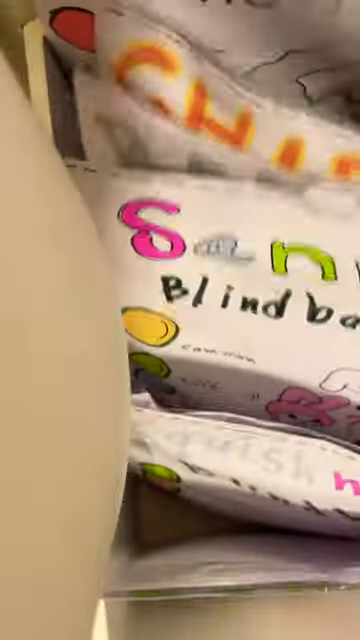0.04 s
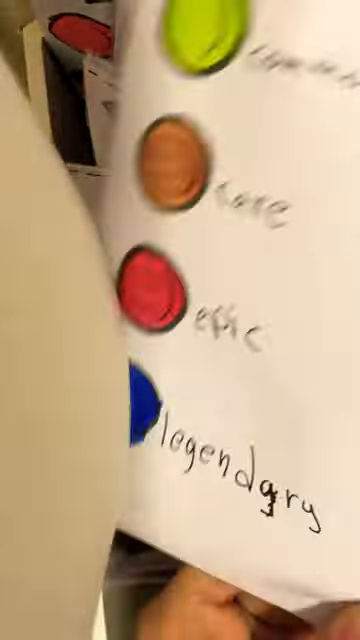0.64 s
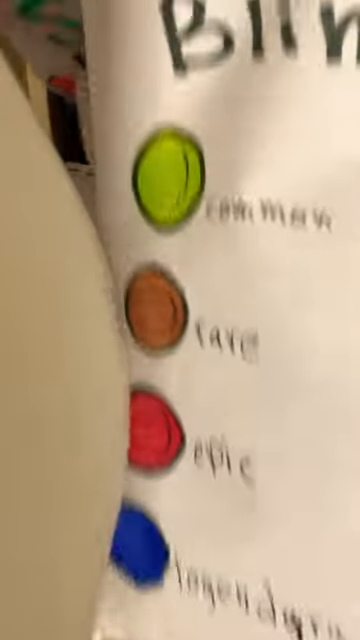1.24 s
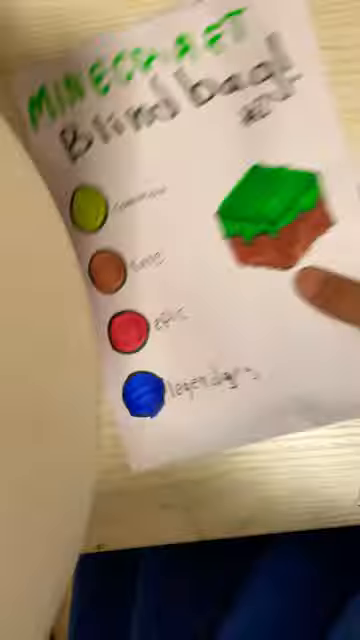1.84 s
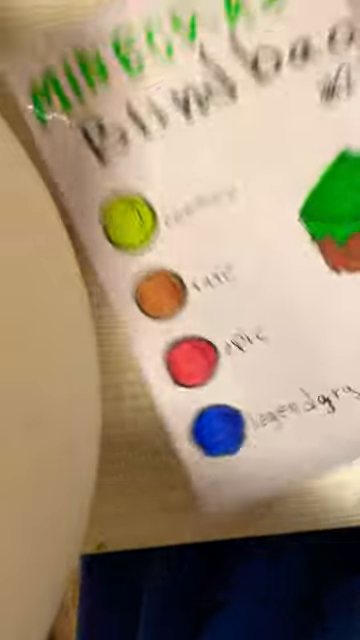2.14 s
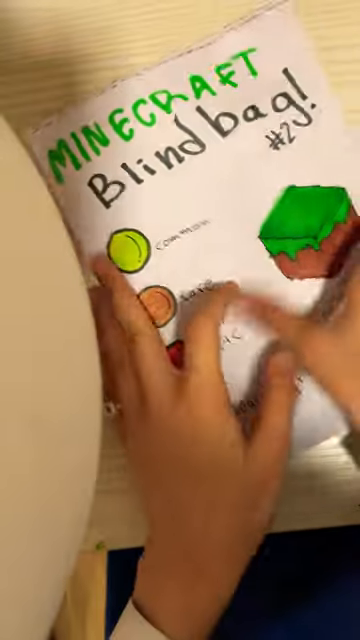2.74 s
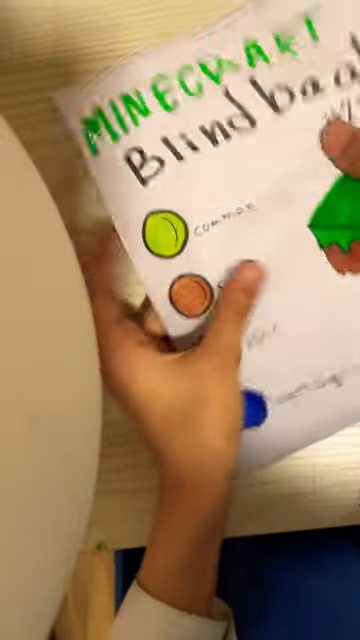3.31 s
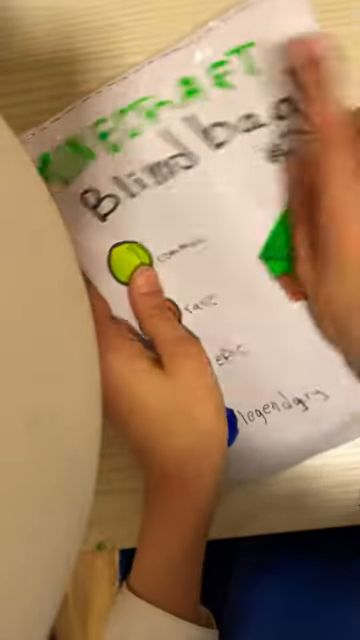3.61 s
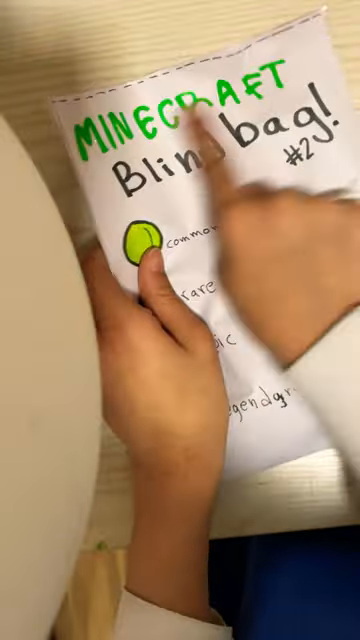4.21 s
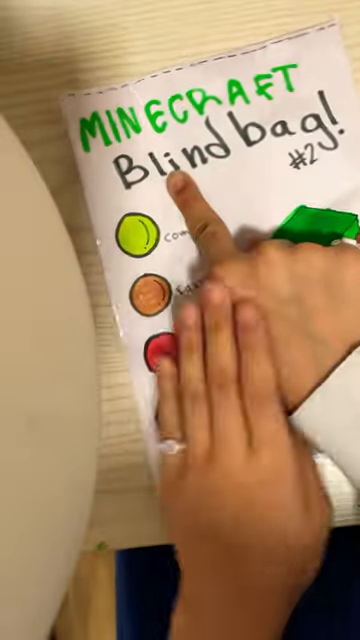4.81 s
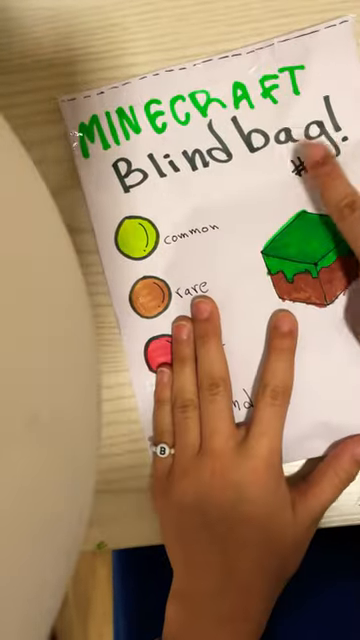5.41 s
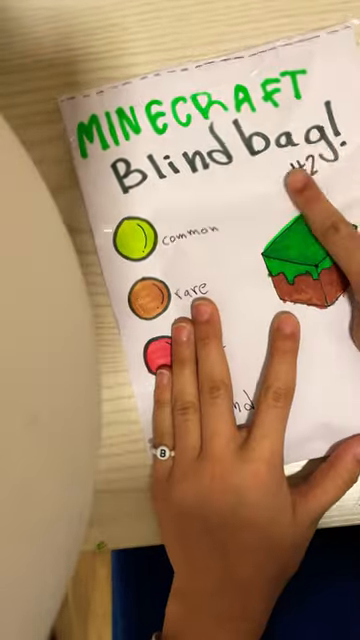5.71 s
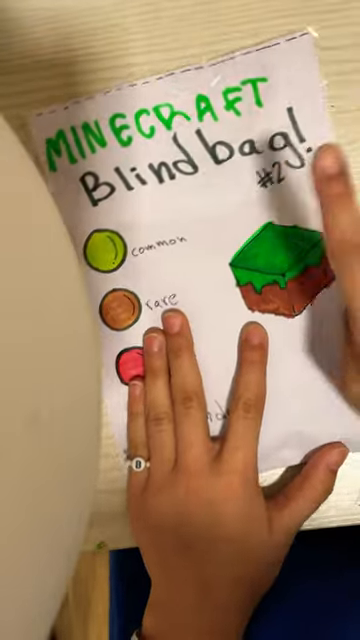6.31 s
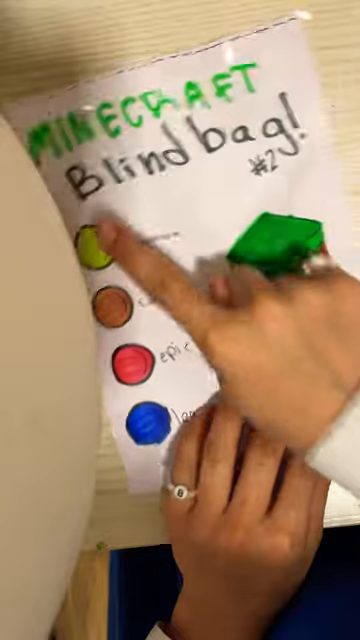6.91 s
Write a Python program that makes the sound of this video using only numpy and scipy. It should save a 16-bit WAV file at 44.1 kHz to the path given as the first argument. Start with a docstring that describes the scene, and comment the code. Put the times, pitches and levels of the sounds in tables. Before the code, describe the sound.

A paper packet is handled close to the microphone in a small room, over a faint hiss and low drone. From the start until about 1.8 seconds it is pulled out of a box: sheets rub, fingers slide and creases snap lightly, with a few soft bumps. The sound drops out for an instant at 1.8 seconds and stays quiet until the packet lands on a wooden table at 2.3 with a crack and a soft thump. A crunch follows at 2.5. From about 2.8 to 5.1 seconds hands press and smooth it flat, with uneven rubbing strokes, dense, sharp crackling and occasional thuds. Between 5.4 and 6.1 seconds fingers tap it about five times, each tap a papery crunch with a hollow thump that falls in pitch and rings briefly in the table. One more tap comes at 6.6, then a few faint crinkles.

```python
"""Over a faint hiss in a small room, a paper packet is pulled out of a box close to a phone: sheets rub,
fingers slide, the packet flexes and creases snap. The level dips briefly at 1.8 s. At 2.27 s the packet lands
on a wooden table and is pressed flat: patches crush under the fingers and strokes of the hand rub and crackle.
Throughout, blows give hollow, falling thumps that ring on in the table, more fully once the packet lies on it."""
import sys
import numpy as np
from scipy import signal
from scipy.fft import rfft, irfft, next_fast_len
from scipy.io import wavfile
from scipy.ndimage import uniform_filter1d

SR = 44100
rng = np.random.default_rng(int(sys.argv[2]) if len(sys.argv) > 2 else 0)


def unload_wav(signal):
    """Save mono or channel-first audio to the path in sys.argv[1] as 16-bit WAV at rate SR, clipped to [-1, 1]."""
    wavfile.write(
        sys.argv[1],
        SR,
        np.round(np.clip(np.atleast_2d(signal).T, -1, 1) * 32767).astype(np.int16),
    )


N = 306495
TIME_S = np.arange(N) / SR
BLOCK = 4096  # samples per crack
AGE_S = np.arange(BLOCK) / SR
FREQ_HZ = np.arange(BLOCK // 2 + 1) * SR / BLOCK + 1
LANDING_S = 2.27


def undb(db):
    """Decibels to gain."""
    return 10 ** (np.asarray(db) / 20)


def unit(x):
    """Scale to rms 1."""
    return x / np.sqrt(np.mean(x ** 2))


def fade(t, t60):
    """Free decay by 60 dB in t60."""
    return np.exp(-np.log(1000) * t / t60)


def add(out, start_s, x):
    """Mix x into out."""
    i = max(int(start_s * SR), 0)
    out[i:i + len(x)] += x[:max(len(out) - i, 0)]


def gains(spectrum, hz):
    """Gain of a (freq_hz, level_db) spectrum at hz."""
    freq_hz, level_db = np.transpose(spectrum)
    return undb(np.interp(np.log(hz + 1), np.log(freq_hz), level_db))


def coloured_noise(spectrum):
    """Scene-long noise with this spectrum, rms 1."""
    n = next_fast_len(N)
    white = rfft(rng.standard_normal(N), n)
    hz = np.arange(n // 2 + 1) * SR / n
    return unit(irfft(white * gains(spectrum, hz), n)[:N])


def minimum_phase(gain):
    """Response whose ringing all follows the blow."""
    cepstrum = irfft(np.log(gain + 1e-9))
    cepstrum[1:BLOCK // 2] *= 2
    cepstrum[BLOCK // 2 + 1:] = 0
    return np.exp(rfft(cepstrum))


def wander(t, rate_hz):
    """Random wander, spread near 1."""
    return np.interp(t * rate_hz, np.arange(BLOCK), rng.standard_normal(BLOCK))


def strokes(rows, t60_s, attack_s=0.0037):
    """Envelope of hand strokes: each starts quickly, holds and dies away."""
    power = 0
    for start_s, length_s, level_db in rows:
        attack = np.clip((TIME_S - start_s) / attack_s, 0, 1)
        release = fade(np.clip(TIME_S - start_s - length_s, 0, 1), t60_s)
        power += (undb(level_db) * attack * release) ** 2
    return np.sqrt(power)


# Hiss spectrum: freq_hz, level_db
HISS_SPECTRUM = [(25, -16), (60, -4), (200, -5.5), (500, -15), (1500, -9.5), (5000, -0.5), (16000, -27)]

def background(hiss_db=-64, drone_db=-54, drone_hz=112, width_hz=14):
    """Faint hiss and a low drone held in one room resonance."""
    resonance = signal.iirpeak(drone_hz, drone_hz / width_hz, fs=SR)
    drone = unit(signal.lfilter(*resonance, coloured_noise(FLEX_SPECTRUM)))
    return undb(hiss_db) * coloured_noise(HISS_SPECTRUM) + undb(drone_db) * drone


def room(x, wet_db=-19, t60_s=0.48, treble_t60_s=0.14, split_hz=4500, build_s=0.0025):
    """Small furnished room: a diffuse tail whose treble dies first."""
    t = np.arange(SR // 2) / SR
    noise = rng.standard_normal(len(t))
    low = signal.sosfilt(signal.butter(1, split_hz, fs=SR, output="sos"), noise)
    tail = low * fade(t, t60_s) + (noise - low) * fade(t, treble_t60_s)
    tail *= 1 - np.exp(-(t / build_s) ** 2)
    return x + undb(wet_db) * signal.fftconvolve(x, tail / np.linalg.norm(tail))[:N]


# Flexing packet spectrum: freq_hz, level_db
FLEX_SPECTRUM = [(25, -20), (42, -14.5), (60, -7), (115, -.5), (160, -4.5), (240, -2.5), (420, -6.5),
                 (700, -15), (1400, -34)]
# Bending in the hands: time_s, level_db
BEND_CURVE = [(0.0, -34), (0.27, -56.5), (0.64, -43.5), (0.95, -57.5), (1.43, -40.5), (1.59, -42),
              (1.76, -55.5), (1.95, -76.5), (2.42, -55), (2.96, -46.5), (4.59, -49.5), (4.95, -44),
              (5.23, -52.5), (5.46, -53.5), (5.81, -40.5), (5.96, -37.5), (6.27, -57.5), (6.95, -53.5)]

def flex(rubbing, bend_db=-2, drag_db=-10, rough_db=4):
    """The whole packet flexes, bent by the hands and dragged by the rubbing."""
    bending = undb(np.interp(TIME_S, *np.transpose(BEND_CURVE)) + bend_db)
    envelope = np.hypot(bending, undb(drag_db) * rubbing)
    return coloured_noise(FLEX_SPECTRUM) * envelope * undb(rough_db * wander(TIME_S, rate_hz=45))


def friction(spectrum, grip, rough_db, gain_db=1.5):
    """Surfaces catch and slip unevenly as the grip wanders."""
    return coloured_noise(spectrum) * undb(gain_db + rough_db * grip)


def crackle(count, low_hz, high_hz, spread_db=5, t60_cycles=15, modes=6):
    """Tiny wrinkles, each ringing a few short modes of its own."""
    out, t = np.zeros(N), AGE_S[:BLOCK // 8]
    sign = (-1) ** np.arange(modes)[:, None]
    for when, weakness, *pitches in rng.random((count, modes + 2)):
        hz = low_hz * (high_hz / low_hz) ** np.array(pitches)[:, None]
        grain = np.sum(sign * np.sin(2 * np.pi * hz * t) * fade(t * hz, t60_cycles), axis=0)
        add(out, when * N / SR, undb(-spread_db * np.log(0.046 + weakness)) * grain)
    return unit(out)


# Sheet on sheet or packet on table: start_s, length_s, level_db
RUB_STROKES = [(0, 0.15, -44.5), (.15, 0.23, -58.5), (.51, .2, -46), (.73, .26, -61), (1.2, 0.48, -53.5),
               (1.85, 0.54, -60), (2.29, 0.049, -41.5), (2.53, .3, -45), (2.85, 0.22, -37.5),
               (3.125, 0.048, -37), (3.22, .08, -36), (3.32, 0.29, -34), (3.63, 0.15, -39),
               (3.82, 0.4, -54.5), (3.98, 0.023, -36.5), (4.17, 0.062, -46), (4.24, .14, -37.5),
               (4.47, 0.24, -45), (4.58, 0.18, -45), (4.9, 0.11, -46.5), (5, .11, -35.5),
               (5.39, 0.092, -40), (5.57, 0.098, -41.5), (5.77, .46, -52.5), (6.48, 0.12, -49),
               (6.61, 0.12, -47.5), (6.84, 0.053, -41)]
# Rubbing sheet spectrum: freq_hz, level_db
RUB_SPECTRUM = [(250, -26), (600, -2.5), (1000, -2.5), (1400, -3.5), (2100, -5.5), (3300, -3.5), (5000, -6),
                (7000, -9.5), (12000, -20)]
# Fingers on paper: start_s, length_s, level_db
SLIDE_STROKES = [(0, .11, -38), (.12, .25, -57), (.51, .22, -49.5), (.755, 0.037, -52),
                 (.856, 0.0089, -46.5), (.91, 0.088, -58), (1.23, 0.48, -53.5), (1.99, 0.062, -59),
                 (2.55, 0.21, -45), (2.82, 0.27, -42.5), (3.12, 0.046, -37), (3.32, 0.27, -38.5),
                 (4.175, 0.072, -42), (4.24, 0.15, -36.5), (4.9, 0.2, -45), (5.18, 0.022, -45),
                 (5.39, 0.21, -51.5), (5.995, 0.015, -47), (6.21, 0.036, -44), (6.47, 0.2, -45)]
# Sliding skin spectrum: freq_hz, level_db
SLIDE_SPECTRUM = [(2000, -16), (4500, -5), (7000, -4.5), (10000, -1.5), (13000, -8), (16000, -6.5)]

def handling(resting_db=-56.5, yield_db=-52, wrinkle_db=2, fibre_db=-7):
    """Hand strokes drive friction, flexing, crackle and small snaps."""
    resting = undb(resting_db) * (TIME_S > LANDING_S)  # resting hands still rub a little
    rubbing = np.hypot(strokes(RUB_STROKES, t60_s=0.27), resting)
    sliding = strokes(SLIDE_STROKES, t60_s=0.12)
    strain = rubbing ** 2 / np.hypot(rubbing, undb(yield_db))  # wrinkles need firm pressure
    grip = wander(TIME_S, rate_hz=130)
    sheets = rubbing * friction(RUB_SPECTRUM, grip, rough_db=6)
    skin = sliding * friction(SLIDE_SPECTRUM, grip, rough_db=4)
    flexing = flex(rubbing)
    wrinkles = undb(wrinkle_db) * strain * crackle(count=800, low_hz=900, high_hz=9000)
    fibres = undb(fibre_db) * sliding * crackle(count=400, low_hz=4000, high_hz=14000)
    return sheets + skin + flexing + wrinkles + fibres + small_snaps(strain)


# Blows reaching the support: start_s, level_db
BLOWS = [(.25, -32.5), (0.402, -33.5), (.445, -36), (.514, -31.5), (.832, -34.5), (1.089, -38.5),
         (1.113, -37), (1.205, -34), (1.627, -39.5), (2.276, -23), (2.517, -25.5), (2.745, -37),
         (2.834, -23.5), (2.875, -33), (3.961, -26.5), (4.614, -36), (4.744, -35.5), (4.78, -37),
         (4.94, -31), (5.366, -31.5), (5.563, -23), (5.757, -19.5), (5.917, -21.5), (6.082, -26),
         (6.598, -27)]
# Modes of the table under the packet: freq_hz, level_db, t60_s
TABLE_MODES = [(96.3, -7.5, 0.23), (112.4, -10, 0.6), (130.4, -16.5, 0.46), (178.3, -19, 0.44),
               (220, -15.5, 0.6), (238, -11, 0.18)]

def thumps(start_hz=720, end_hz=100, overtone=0.39, rough=0.39, held_db=-5, lying_db=1):
    """Short bending waves outrun long ones, so each thump falls in pitch; the table rings on."""
    out, t = np.zeros(N), np.arange(SR // 2) / SR
    for start_s, level_db in BLOWS:
        glide_s = 0.00511 * 2 ** ((level_db + 30) / 23)  # harder blows glide longer
        glide = np.exp(-t / glide_s)
        phase = 2 * np.pi * np.cumsum(end_hz + (start_hz - end_hz) * glide) / SR
        peak_s = 1.78 * glide_s
        swell = t / peak_s * np.exp(1 - t / peak_s)
        flutter = 1 + rough * wander(t, rate_hz=500)
        tone = np.sin(phase) + overtone * np.sin(2 * phase)
        add(out, start_s, undb(level_db) * swell * flutter * tone)
        detunes = 1 + 0.023 * rng.standard_normal(len(TABLE_MODES))
        ring = sum(undb(mode_db) * fade(t, t60_s) * np.sin(2 * np.pi * hz * detune * t)
                   for (hz, mode_db, t60_s), detune in zip(TABLE_MODES, detunes))
        contact_db = held_db if start_s < LANDING_S else lying_db
        add(out, start_s + 2 * glide_s, undb(level_db + contact_db) * ring * (1 - glide))
    return out


# Packet cavity spectrum: freq_hz, level_db
HOLLOW_SPECTRUM = [(150, -22), (250, -7.5), (330, -3), (430, 3.5), (520, -9.5), (640, -.5), (800, -10.5),
                   (1500, -32.5)]

def knocks(gain_db=-9, rise_s=0.011, t60_s=0.071, tail_db=-14, tail_t60_s=0.43):
    """Each blow also knocks the packet's hollow: a short swell with a papery tail."""
    envelope, t = np.zeros(N), np.arange(SR // 2) / SR
    after_s = np.maximum(t - rise_s, 0)
    decay = fade(after_s, t60_s) + undb(tail_db) * fade(after_s, tail_t60_s)
    shape = np.minimum(t / rise_s, 1) * decay
    for start_s, level_db in BLOWS:
        add(envelope, start_s, undb(level_db + gain_db) * shape)
    return envelope * coloured_noise(HOLLOW_SPECTRUM)


# Packet's colouring of its own cracks: freq_hz, gain_db
PACKET_RESPONSE = [(40, -19), (120, -3.5), (300, -5.5), (650, 0.5), (1000, 0), (1500, 0.5), (2100, -3.5),
                   (2700, 1.5), (3600, 2.5), (5500, 2), (9000, 0), (13000, -5), (16000, -12.5)]

def facet(push, resonance_hz, fall_db_per_oct, body_db, knee_hz=4500, body_hz=1200, clear_hz=3200):
    """A stiff facet radiates from its lowest resonance upward; the whole sheet adds a dull body."""
    smallness = np.hypot(1, resonance_hz / clear_hz)  # small facets: clearer ring, less body
    q = 1.7 * smallness
    ratio = FREQ_HZ / resonance_hz
    ring = ratio ** 2 / np.hypot(1 - ratio ** 2, ratio / q)
    radiation = ratio / np.hypot(1, ratio)
    treble = np.hypot(1, FREQ_HZ / knee_hz) ** (-fall_db_per_oct / (20 * np.log10(2)))
    body = undb(body_db) / smallness / (1 + (FREQ_HZ / body_hz) ** 2)
    colour = np.hypot(ring * radiation * treble, body) * gains(PACKET_RESPONSE, FREQ_HZ)
    # the push sets the fine resonances, the facet the broad colour
    drive = rfft(push)
    drive_trend = np.sqrt(uniform_filter1d(np.abs(drive) ** 2, size=240))
    sound = irfft(drive * minimum_phase(colour / drive_trend))
    return sound * np.sqrt(0.005 * SR / np.sum(sound ** 2))  # energy of 5 ms at rms 1


# Patches giving way: start_s, level_db, resonance_hz, fall_db_per_oct, length_s
CRUSHED_PATCHES = [(2.276, -15.5, 1235, 13.5, 0.015), (2.505, -5, 1490, 9, 0.025),
                   (2.711, -13.5, 1900, 10, 0.017), (3.742, -12.5, 3220, 14.5, 0.016),
                   (3.957, -5.5, 1160, 12.5, 0.019), (4.459, -8.5, 1740, 5.5, 0.011),
                   (4.623, -9.5, 1300, 4, 0.017), (5.367, -11.5, 1270, 7.5, 0.016),
                   (5.55, -13, 1350, 9, 0.016), (5.753, -13.5, 1420, 27, 0.012),
                   (5.904, -15.5, 1170, 11.5, 0.017), (6.07, -23, 702, 10, 0.016),
                   (6.59, -8, 1440, 8.5, 0.017)]

def crushes(gain_db=3, touch_s=0.007, touch_db=-19, lead_s=0.002,
            rough_db=4, tail_db=-13, tail_t60_s=0.14):
    """A finger touches, then many tiny folds give way in one short swell."""
    out, t = np.zeros(N), AGE_S - touch_s
    touch = undb(touch_db) * (t < 0) * AGE_S / touch_s
    for start_s, level_db, resonance_hz, fall_db_per_oct, length_s in CRUSHED_PATCHES:
        swell = np.sin(np.pi * np.clip((t + lead_s) / (length_s + 2 * lead_s), 0, 1))
        tail = np.clip(t / length_s, 0, 1) * fade(np.maximum(t - length_s, 0), tail_t60_s)
        folds = undb(rough_db * wander(AGE_S, rate_hz=900))
        push = rng.standard_normal(BLOCK) * (touch + swell + undb(tail_db) * tail) * folds
        sound = facet(push, resonance_hz, fall_db_per_oct, body_db=-5)
        add(out, start_s - touch_s, undb(level_db + gain_db) * sound)
    return out


def crease(flip_s, resonance_hz, fall_db_per_oct, crack=3.24, split_hz=6000, tiny_hz=5000,
           late_db=-23, creak_db=-15, creak_s=0.0037):
    """A crease creaks, flips with a crack and scatters bending waves. Returns start_s, sound."""
    life = 1 / (1 + (resonance_hz / tiny_hz) ** 2)  # small facets die first
    noise = rng.standard_normal(BLOCK)
    dull = irfft(rfft(noise) / (1 + (FREQ_HZ / split_hz) ** 4))
    flip = dull * fade(AGE_S, 0.026 * life) + (noise - dull) * fade(AGE_S, 0.015 * life)
    flip += undb(late_db) * noise * fade(AGE_S, 0.078 * life)
    flip[0] += crack / np.sqrt(life)
    lead = int(creak_s * SR)
    creak = undb(creak_db) * life * dull[-lead:] * np.linspace(0, 1, lead)
    push = np.concatenate([creak, flip])[:BLOCK]
    body_db = 2.5 if flip_s < LANDING_S else -7.5  # damped once the sheet lies flat
    return flip_s - lead / SR, facet(push, resonance_hz, fall_db_per_oct, body_db)


def small_snaps(strain, count=380, gain_db=6, spread_db=6, centre_hz=1300, spread_oct=0.52):
    """Lesser creases flip at random, as strongly as the paper is strained."""
    out = np.zeros(N)
    for when, size, pitch in rng.uniform(-1, 1, (count, 3)):
        i = int((when + 1) / 2 * N)
        start_s, sound = crease(i / SR, centre_hz * 2 ** (spread_oct * pitch), fall_db_per_oct=21)
        add(out, start_s, strain[i] * undb(gain_db + spread_db * size) * sound)
    return out


# Single creases snapping: flip_s, level_db, resonance_hz, fall_db_per_oct
BIG_CREASES = [(0.059, -26, 850, 12), (0.106, -25.5, 750, 26), (0.14, -19.5, 4400, 13),
               (0.25, -34.5, 1400, 36.5), (0.295, -32.5, 845, 24), (0.353, -36.5, 5470, -17),
               (0.403, -33.5, 1400, 39), (0.443, -21.5, 1980, 24), (0.479, -25.5, 1090, 26),
               (0.507, -14, 1050, 4), (0.519, -26, 2120, 21), (0.554, -25, 1630, 52),
               (0.688, -18, 1500, 15), (0.707, -22, 4930, -8), (0.831, -29.5, 1060, 14),
               (0.907, -19.5, 5830, -4), (0.945, -38.5, 1090, 43), (0.999, -37.5, 5750, 2),
               (1.09, -47, 900, 34.5), (1.136, -40.5, 1100, 48.5), (1.204, -33.5, 1400, 38),
               (1.276, -18, 1410, 16), (1.277, -20, 5130, 24), (1.331, -29, 1390, 25),
               (1.423, -29, 2630, 4.5), (1.51, -33, 1380, 26), (1.595, -25, 1390, 41), (1.623, -19, 870, 4),
               (1.76, -26.5, 1800, 16.5), (2.274, -11.5, 3300, 13.5), (2.32, -28, 1390, 15),
               (2.621, -14.5, 2220, 3.5), (2.831, -14.5, 1420, 6), (2.883, -16, 1390, 9),
               (2.896, -13.5, 1190, 12), (2.91, -12, 755, 3), (2.915, -12, 1440, 32),
               (2.95, -23.5, 1080, 33), (2.963, -22, 1370, 34), (2.981, -22.5, 5000, 1),
               (2.995, -17.5, 890, 20), (3.026, -22, 2500, 16), (3.05, -12.5, 1470, 3.5),
               (3.128, -24, 1180, 11.5), (3.138, -20, 1200, 2), (3.182, -22, 660, 25),
               (3.247, -16.5, 1300, 9.5), (3.334, -11.5, 850, 3), (3.365, -10.5, 1260, 13),
               (3.411, -11.5, 2500, 4), (3.415, -13.5, 2140, 7), (3.424, -14, 740, 11),
               (3.479, -21, 1080, 13), (3.545, -17.5, 700, 10), (3.572, -8.5, 1260, 9),
               (3.651, -13, 1110, 7.5), (3.715, -9.5, 1530, 5), (3.763, -14.5, 1180, 34),
               (3.793, -11, 1130, 15.5), (3.992, -12.5, 1790, 7), (4.039, -17.5, 1380, 13.5),
               (4.179, -30, 1190, 46), (4.24, -10, 1470, 6.5), (4.284, -17.5, 2300, 9),
               (4.309, -18, 1410, 10.5), (4.324, -10, 1120, 0.5), (4.454, -11.5, 1480, 5.5),
               (4.619, -11, 1300, 9.5), (4.796, -15.5, 1160, 10), (4.892, -24.5, 1080, 12),
               (4.915, -21.5, 1390, 19), (4.944, -23, 1640, 10), (5, -14.5, 1700, 11),
               (5.033, -17, 1370, 13), (5.077, -18, 1930, 21), (5.084, -18, 2720, 24),
               (5.092, -14.5, 1520, 10), (5.106, -16, 4470, 16), (5.207, -26.5, 1190, 5),
               (5.223, -20, 1950, 26), (5.363, -11, 1270, 10.5), (5.427, -21, 1380, 7),
               (5.438, -20.5, 2720, 11), (5.466, -12, 3900, -1.5), (5.547, -14, 3540, 9),
               (5.571, -18, 2300, 4), (5.644, -15.5, 1260, 9), (5.656, -17, 1510, 15),
               (5.663, -11, 4340, -1), (5.743, -20, 1790, 14), (5.75, -8.5, 1640, 3.5),
               (5.799, -17, 1530, 11.5), (5.918, -24, 4770, 15), (6.008, -28, 2440, 5),
               (6.085, -23, 4020, 6), (6.226, -23.5, 2550, 5.5), (6.592, -14, 1400, 7),
               (6.613, -14.5, 1840, 13), (6.874, -23, 4900, 10), (6.925, -29.5, 1600, 7)]

def snaps(gain_db=0.5):
    """The big creases flip one by one."""
    out = np.zeros(N)
    for flip_s, level_db, resonance_hz, fall_db_per_oct in BIG_CREASES:
        start_s, sound = crease(flip_s, resonance_hz, fall_db_per_oct)
        add(out, start_s, undb(level_db + gain_db) * sound)
    return out


# Brief dip in overall level: time_s, gain_db
LEVEL_DIP = [(1.761, 2), (1.767, -37), (1.83, -9.5), (1.86, -9), (1.98, -2)]

def scene():
    """Paper and table in the room, over the background; mono."""
    sound = room(snaps() + crushes() + thumps() + knocks() + handling()) + background()
    gain = undb(np.interp(TIME_S, *np.transpose(LEVEL_DIP)))
    return (sound * gain)[None]


def record(dry, low_cut_hz=48, high_cut_hz=15800):
    """The phone rounds the tallest peaks and cuts the deep bass and the top."""
    rounded = dry / (1 + dry ** 4) ** 0.25
    lean = signal.sosfilt(signal.butter(4, low_cut_hz, "high", fs=SR, output="sos"), rounded)
    return signal.sosfilt(signal.ellip(8, 0.2, 70, high_cut_hz, fs=SR, output="sos"), lean)


dry = scene()
out = record(dry)
unload_wav(out)
```